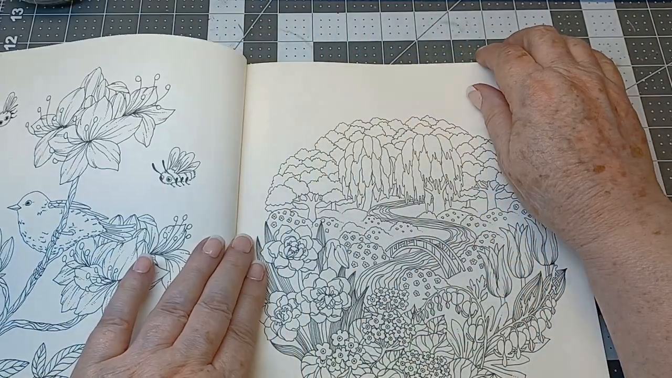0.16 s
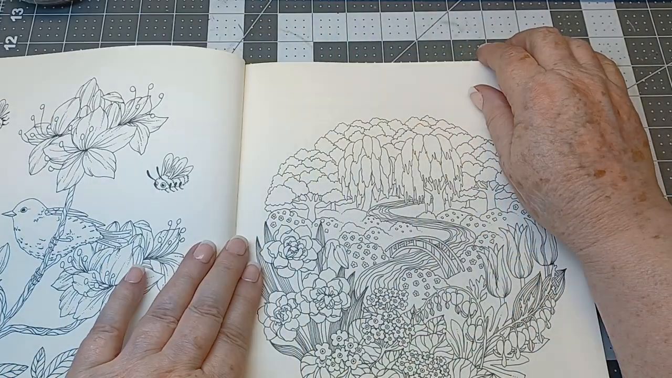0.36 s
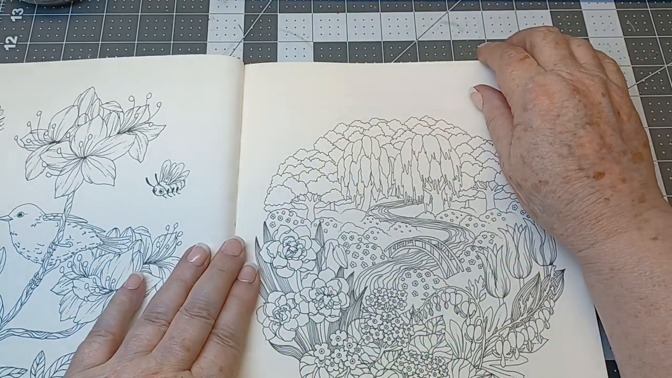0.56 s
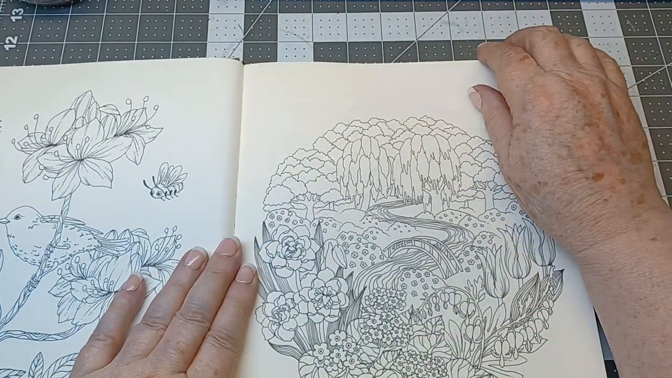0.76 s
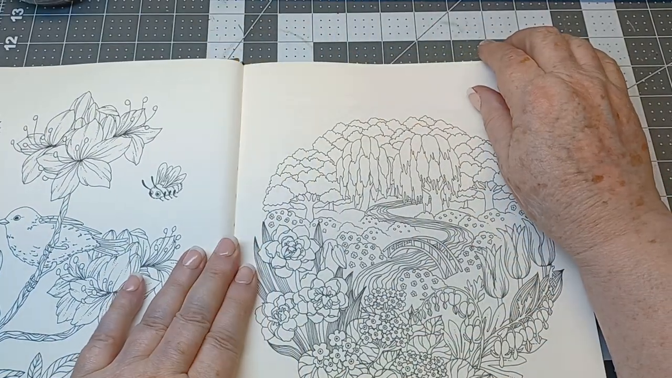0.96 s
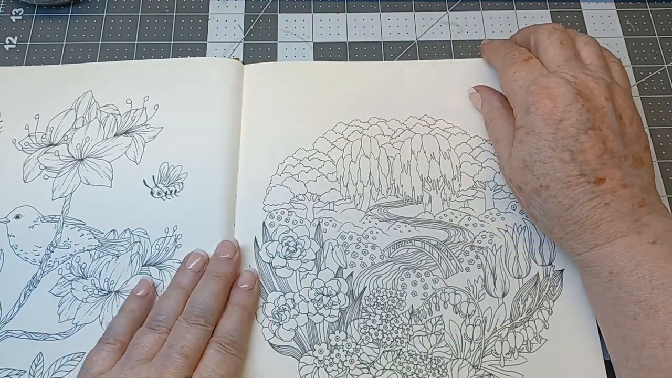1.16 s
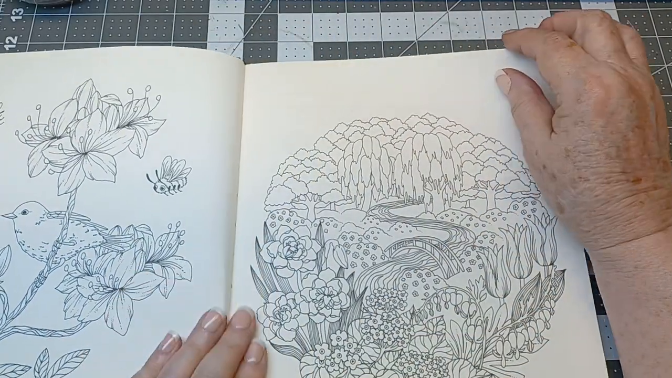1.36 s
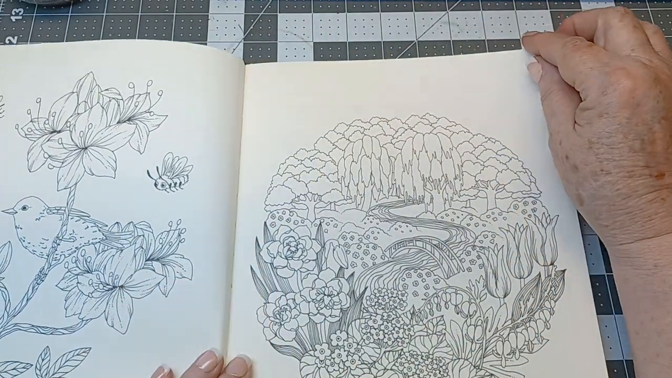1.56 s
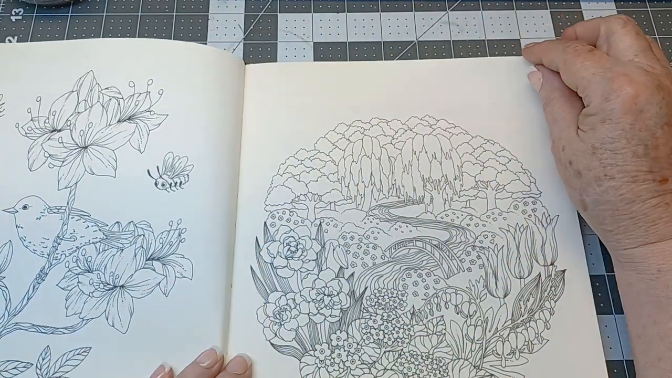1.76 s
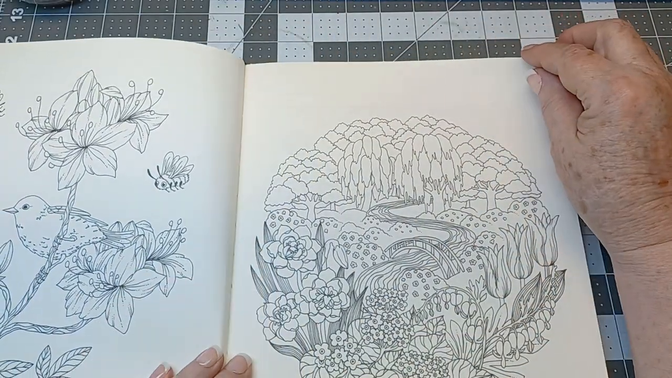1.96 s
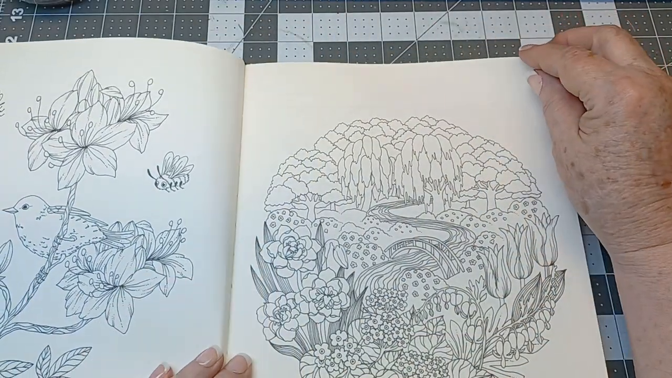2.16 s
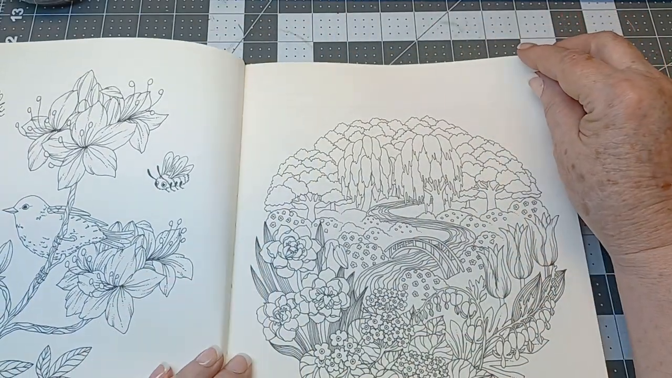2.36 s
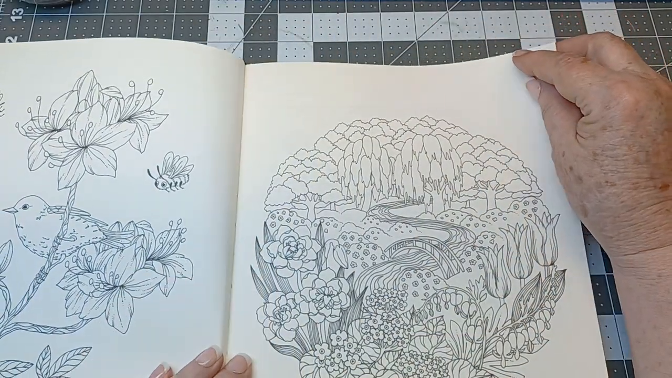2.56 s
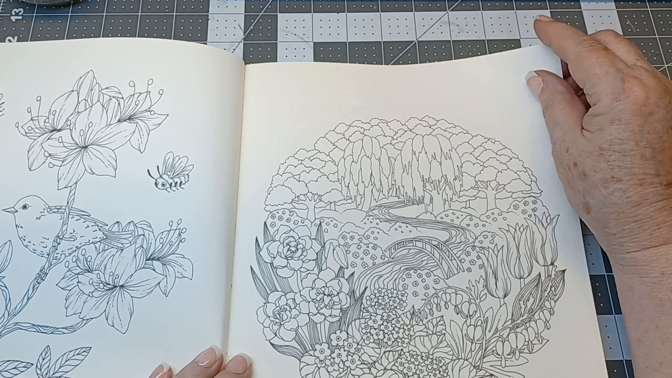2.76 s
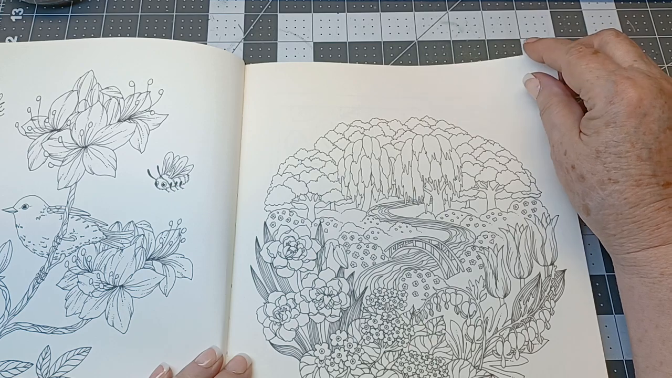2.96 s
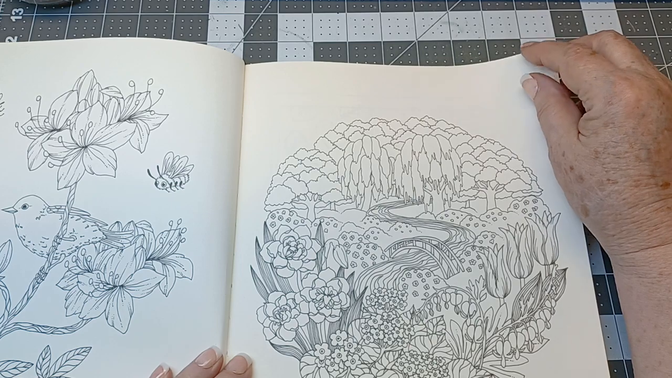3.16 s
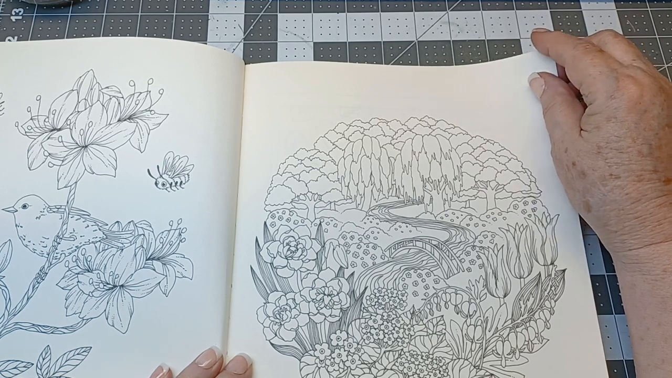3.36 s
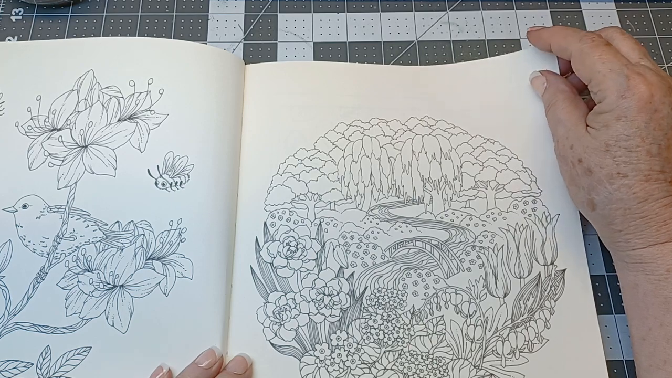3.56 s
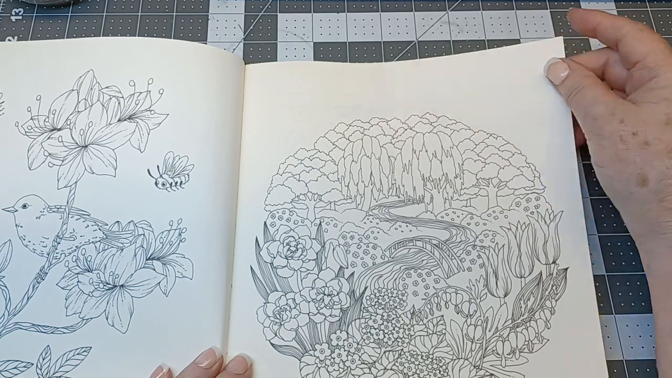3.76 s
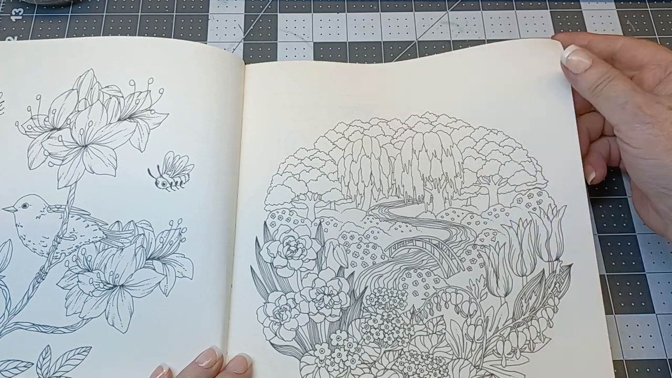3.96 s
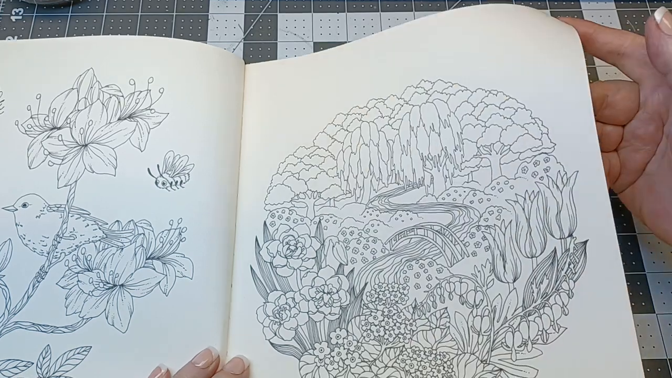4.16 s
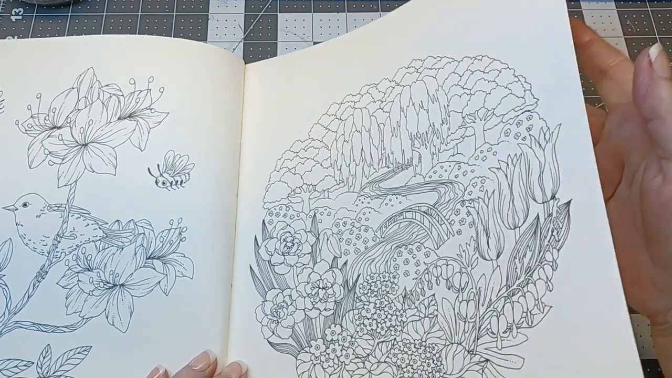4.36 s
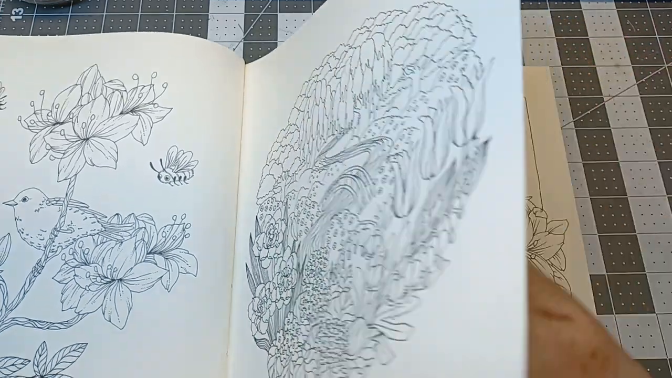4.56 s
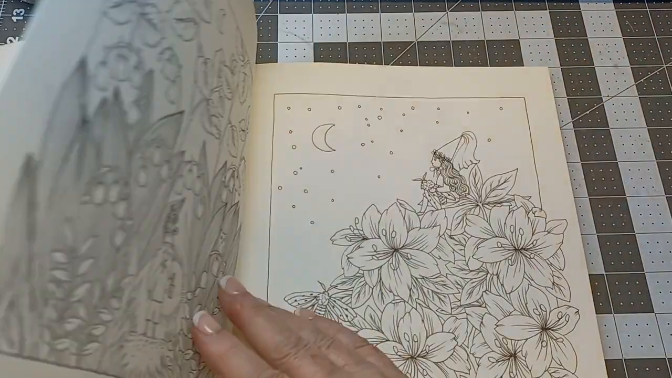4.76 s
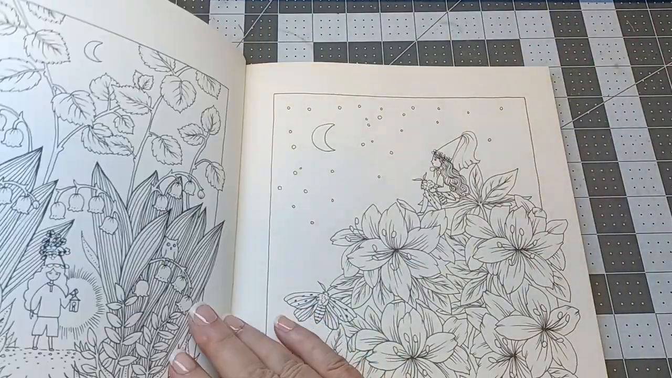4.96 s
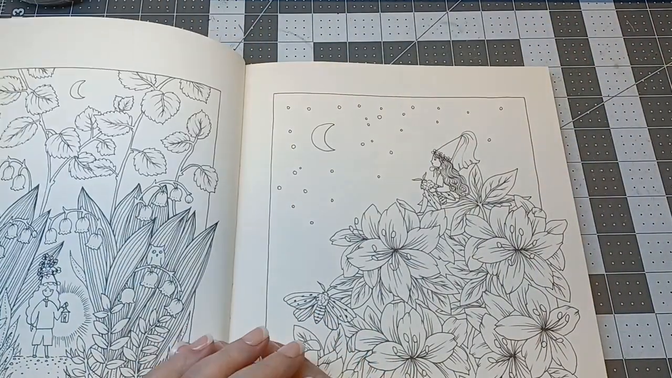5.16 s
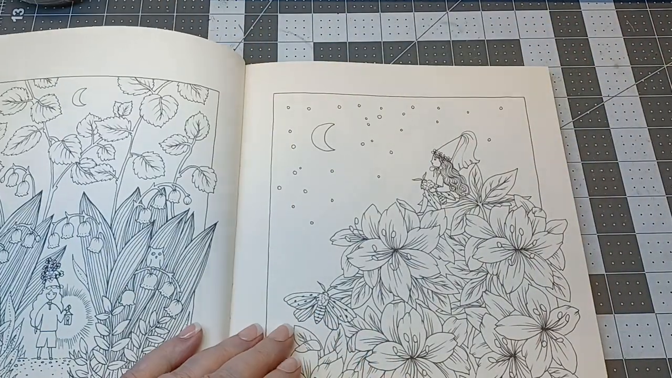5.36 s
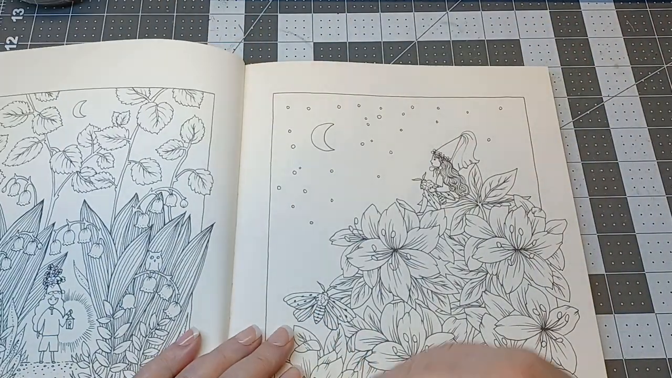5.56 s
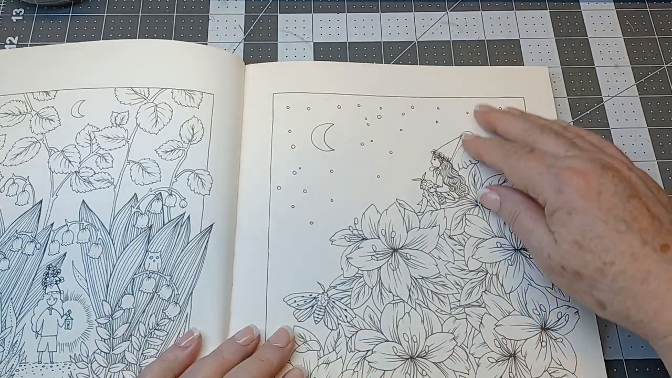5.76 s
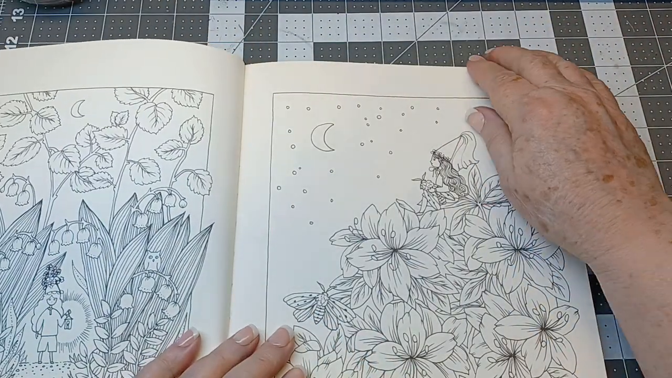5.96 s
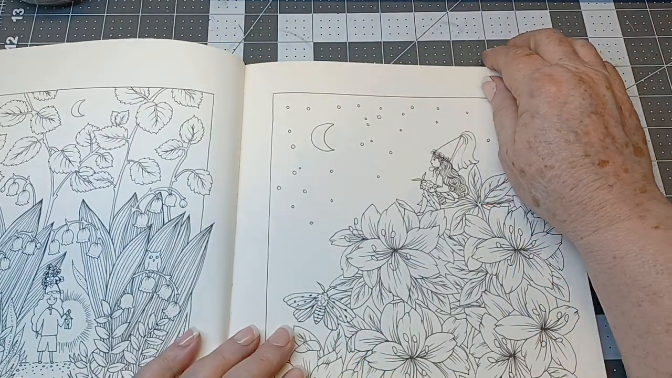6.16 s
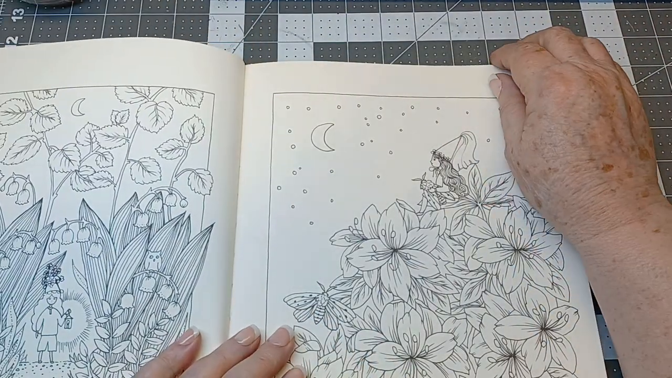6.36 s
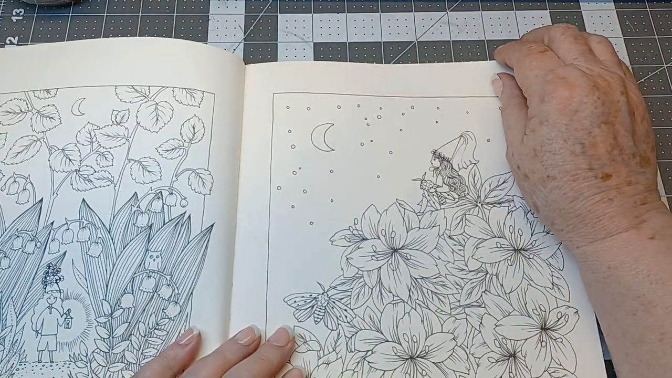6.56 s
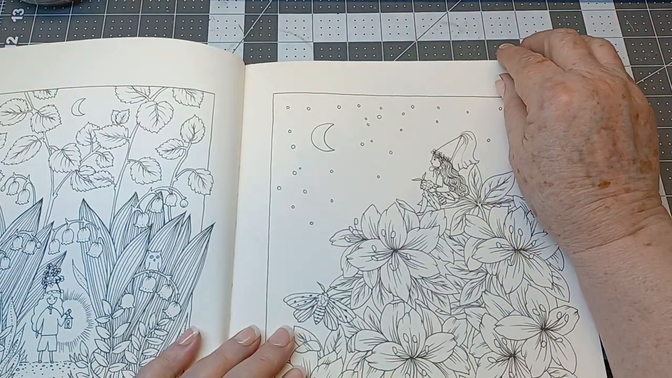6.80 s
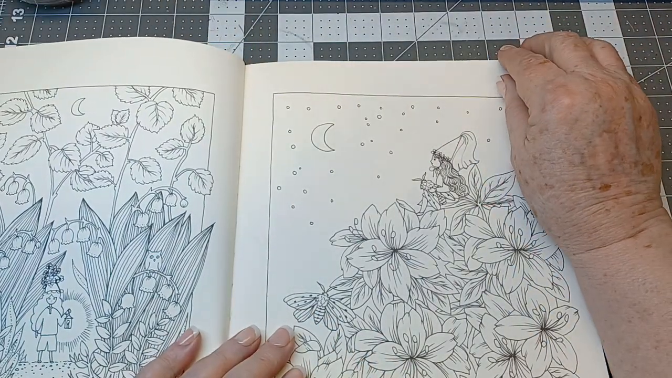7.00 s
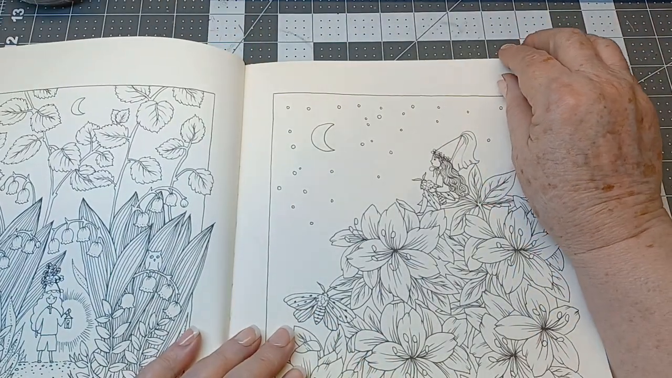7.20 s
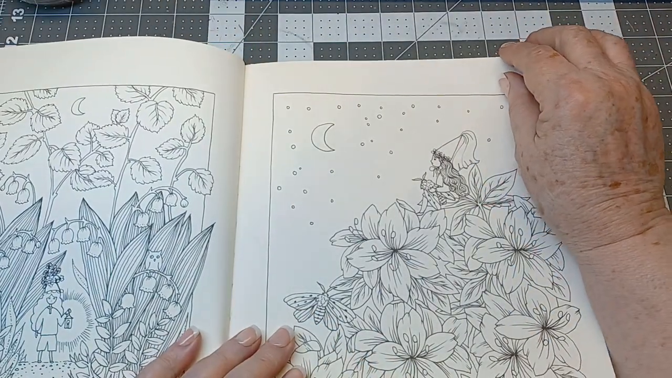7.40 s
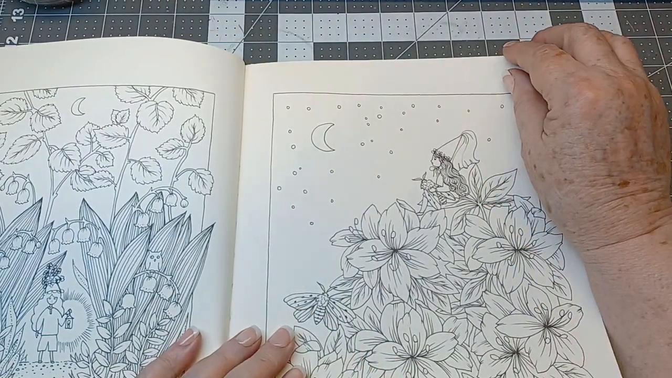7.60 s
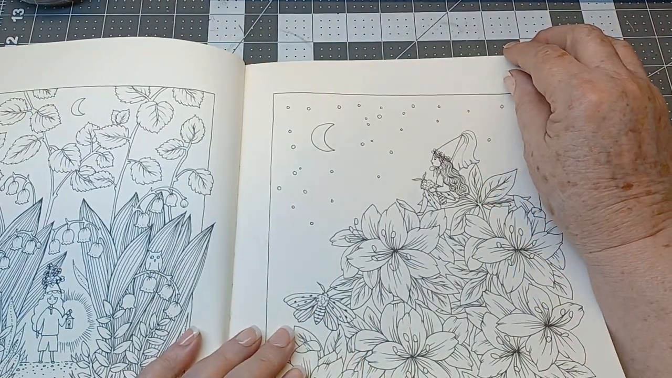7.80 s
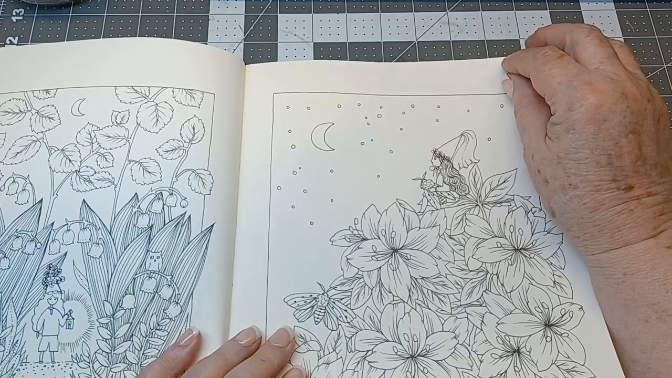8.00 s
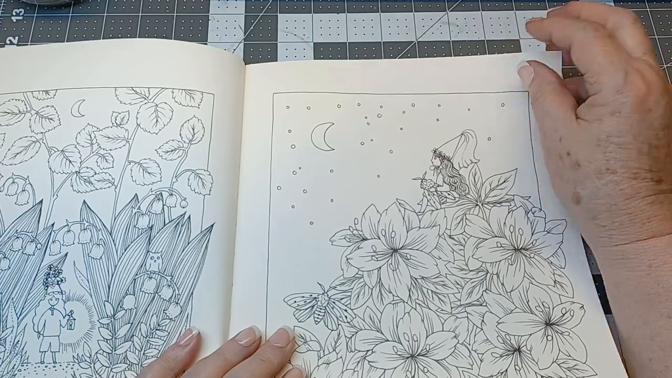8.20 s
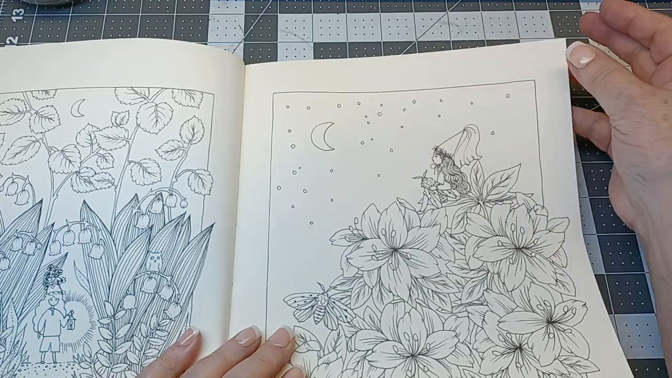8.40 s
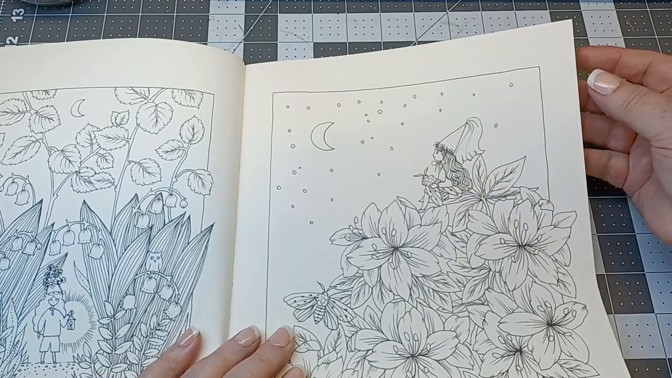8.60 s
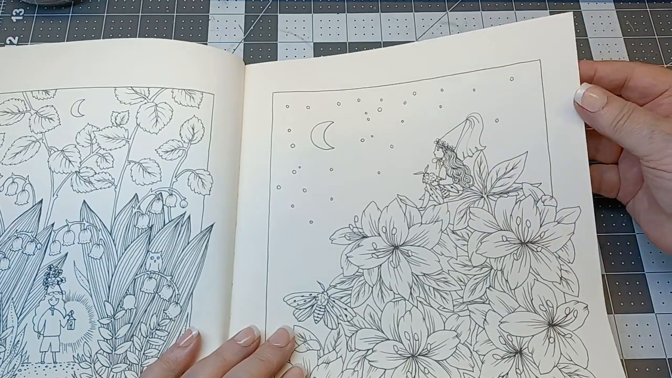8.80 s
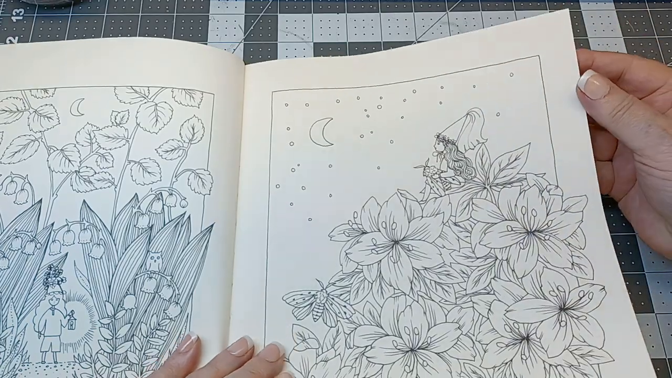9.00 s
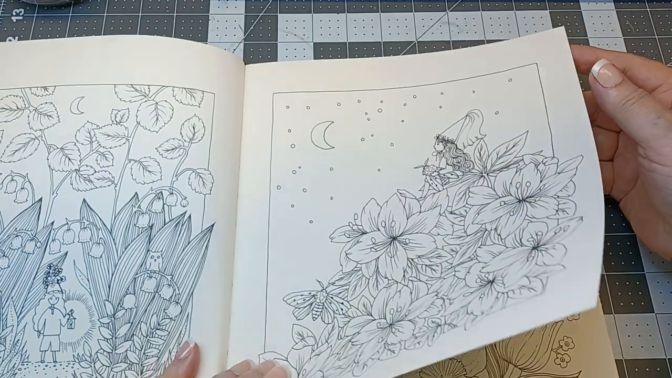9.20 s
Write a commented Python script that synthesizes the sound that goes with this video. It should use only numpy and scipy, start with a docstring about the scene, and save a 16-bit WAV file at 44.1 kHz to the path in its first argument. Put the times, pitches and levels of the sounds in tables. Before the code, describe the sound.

Soft skin hiss and small corner snaps on thick paper, one flapping page turn, and a dull engine hum beyond the wall.

```python
"""A small room, close to a large book whose thick pages are picked at the corner, turned and smoothed.
Skin hisses over the paper, the corner snaps off a fingernail and the lifted sheet buckles and booms.
Snaps and booms ring briefly in the room, over a bed of room tone and a thin electric whine.
Outside an engine pulls away and changes gear, heard dull through the wall."""
import sys
import numpy as np
from scipy import signal
from scipy.fft import rfft, irfft, next_fast_len
from scipy.io import wavfile
from scipy.ndimage import map_coordinates

SR = 44100
rng = np.random.default_rng(int(sys.argv[2]) if len(sys.argv) > 2 else 0)


def materialize(psi):
    """Save the field psi as 16-bit PCM at rate SR to the path in sys.argv[1].

    A 1-D psi becomes a single channel; in a 2-D psi each row is a channel.
    """
    bounded = np.clip(np.atleast_2d(psi).T, -1, 1)
    quanta = np.round(bounded * 32767).astype(np.int16)
    wavfile.write(sys.argv[1], SR, quanta)


N = 407472


def amp(db):
    """dB to gain."""
    return 10 ** (np.asarray(db) / 20)


def unit_rms(x):
    return x / np.sqrt(np.mean(x ** 2) + 1e-20)


def unit_peak(x):
    return x / np.abs(x).max()


def curve_at(points, hz):
    """Reads (freq_hz, value) points on a log frequency axis."""
    freqs, values = np.transpose(points)
    return np.interp(np.log(hz + 1), np.log(freqs + 1), values)


def automation(points):
    """Draws (time_s, value) points as one value per sample."""
    return np.interp(np.arange(N) / SR, *np.transpose(points))


def wobble(rate):
    """A smooth random curve, rate knots a second."""
    knots = rng.standard_normal(int(N * rate / SR) + 4)
    return map_coordinates(knots, [np.arange(N) * rate / SR])


def filtered(x, response):
    """EQs x with a complex response of frequency."""
    size = next_fast_len(x.shape[-1] + 8192)
    return irfft(rfft(x, size) * response(np.fft.rfftfreq(size, 1 / SR)), size)[..., :x.shape[-1]]


def band(f, centre_hz, width_hz):
    """The response of one resonance."""
    return 1j * f * width_hz / (centre_hz ** 2 - f ** 2 + 1j * f * width_hz)


def resonances(peaks):
    """The response of (pitch_hz, width_hz, level_db) resonances, summed in alternating polarity."""
    return lambda f: sum((-1) ** k * amp(db) * band(f, hz, width)
                         for k, (hz, width, db) in enumerate(peaks))


# How alike left and right are: freq_hz, correlation
STEREO_LIKENESS = [(60, 0.38), (300, 0.45), (1500, 0.18), (8000, 0.041)]
def stereo_noise(colour, n):
    """Coloured noise of rms 1, partly alike in the bass and wide in the treble."""
    def mid_side(f):
        angle = np.arccos(curve_at(STEREO_LIKENESS, f)) / 2
        return colour(f) * [np.cos(angle), np.sin(angle)]
    mid, side = filtered(rng.standard_normal((2, n)), mid_side)
    return unit_rms(np.array([mid + side, mid - side]))


# EQ of the still room: freq_hz, gain_db
ROOM_TONE_EQ = [(21, -40), (35, -25.5), (76, -10), (108, -2.5), (176, -12), (245, -4.5), (334, -16),
                (720, -16.5), (1230, -28), (3910, -34.5), (7810, -32), (9340, -40), (13000, -33),
                (16000, -43)]
def room_tone(level_db=-73):
    """A steady, bass-heavy bed of air."""
    return amp(level_db) * stereo_noise(lambda f: amp(curve_at(ROOM_TONE_EQ, f)), N)


def electric_whine(pitch_hz=6342, level_db=-103):
    """A faint, thin tone whose level drifts."""
    return amp(level_db + 3 * wobble(2)) * np.sin(2 * np.pi * pitch_hz * np.arange(N) / SR)


# EQ of skin sliding on paper: freq_hz, gain_db
SKIN_HISS_EQ = [(2000, -31), (4500, -17), (6500, -4), (9000, -6), (13000, 0), (16000, -9)]
def stroke_noise(rustle_db, cup_hz, hiss_db, flex_db):
    """Skin on paper: a rustle coloured by the hollow under the hand, a fine hiss and a low flexing."""
    cup_gain = amp(13) if cup_hz > 500 else 0
    grip_db = 2.2 * rng.standard_normal(80)  # each grip has its own small resonances, on a 200 Hz grid

    def power(f):
        hollow = band(f, 4410, 5000) ** 2 + amp(-14) * band(f, 6500, 3000)  # the flat hand
        if cup_gain:
            hollow += cup_gain * band(f, cup_hz, .16 * cup_hz) ** 2
        grip = amp(np.interp(f / 200, np.arange(len(grip_db)), grip_db))
        rustle = amp(rustle_db) * unit_rms(abs(hollow) * grip)
        hiss = amp(hiss_db) * unit_rms(amp(curve_at(SKIN_HISS_EQ, f)))
        flex = amp(flex_db) * unit_rms(abs(band(f, 1300, 2000)) ** 2)
        return rustle ** 2 + hiss ** 2 + flex ** 2

    level = np.sqrt(np.mean(power(np.linspace(0, SR / 2, 400))))
    return level * stereo_noise(lambda f: np.sqrt(power(f)), round(.8 * SR))


# Hand moves on the page; a cup_hz of 500 or less is a flat hand:
# peak_s, rise_s, fall_s, rustle_db, cup_hz, hiss_db, flex_db
HAND_STROKES = [(.06, 0.32, 0.12, -75.5, 0, -81, -77), (.22, 0.23, 0.088, -74.5, 1698, -79, -77),
                (1.355, .2, 0.13, -54.5, 0, -55.5, -69.5), (1.48, 0.26, 0.13, -65, 2400, -87, -87),
                (1.55, 0.3, 0.2, -69, 3202, -83, -81), (1.69, 0.058, 0.041, -84, 2, -85, -84.5),
                (1.85, 0.15, 0.13, -86, 1842, -95, -80), (1.988, 0.048, 0.029, -74, 0, -97, -90),
                (2.2, 0.05, 0.081, -66, 0, -82, -76), (2.73, 0.094, 0.14, -74, 4598, -82, -80),
                (2.86, 0.075, 0.061, -71, 2320, -97, -78), (2.86, 0.12, .18, -68.5, 0, -83, -82),
                (3.24, 0.036, .12, -77.5, 4600, -100, -81), (3.39, .049, 0.061, -74, 0, -93, -80),
                (3.62, 0.069, 0.38, -73.5, 0, -96, -76.5), (3.75, 0.052, 0.06, -67, 0, -79, -65.5),
                (3.97, 0.12, 0.14, -69, 0, -68, -74), (4.12, 0.17, 0.24, -75, 0, -77, -78),
                (4.43, 0.13, 0.14, -60.5, 0, -58, -61.5), (4.6, 0.11, 0.11, -55.5, 0, -52.5, -50),
                (4.8, 0.3, 0.1, -67.5, 2, -66.5, -74.5), (4.93, .15, 0.49, -72, -3, -72.5, -86),
                (5.08, 0.12, 0.083, -68, -1.5, -70.5, -80.5), (5.32, 0.31, .17, -64, -0.5, -61, -78.5),
                (5.68, 0.023, 0.089, -58.5, -0.5, -54, -68), (5.8, .1, 0.11, -65.5, 0, -55.5, -78),
                (6.05, .22, 0.15, -80.5, 0.5, -67, -93), (6.39, 0.066, 0.047, -77.5, 0, -78, -89),
                (6.5, 0.066, 0.038, -78, 1, -72, -87), (7.322, 0.074, .13, -79.5, 5254, -98, -93),
                (7.55, 0.11, 0.068, -75.5, -0.5, -96.5, -80.5), (8.04, 0.11, 0.057, -79.5, -0.5, -110, -99),
                (8.24, 0.033, 0.096, -68.5, 0, -100, -91), (8.361, .14, 0.22, -69, 5263.5, -72, -96),
                (8.571, 0.11, 0.14, -65, 5333.5, -63, -81), (8.75, 0.21, 0.33, -70.5, 5090.5, -76.5, -79),
                (8.76, 0.033, 0.12, -70.5, 2131, -88, -91.5), (8.88, 0.072, 0.16, -79, 5128, -93, -77),
                (9.0, 0.11, 0.096, -67.5, 6, -67.5, -62.5), (9.111, 0.11, 0.046, -71.5, 0, -72, -68),
                (9.24, 0.087, .096, -56, 0, -100, -48.5)]
def hand_strokes():
    """Skin drags over the paper's tooth, swelling and fading with the pressure of the hand."""
    out = np.zeros((2, N + 2 * SR))
    for peak_s, rise_s, fall_s, rustle_db, cup_hz, hiss_db, flex_db in HAND_STROKES:
        friction = stroke_noise(rustle_db, cup_hz, hiss_db, flex_db)
        half = friction.shape[1] // 2
        t = np.arange(-half, half) / SR
        pressure = np.exp(-2.2 * (t / np.where(t < 0, rise_s, fall_s)) ** 2)
        centre = SR + round(peak_s * SR)
        out[:, centre - half:centre + half] += pressure * friction
    drag = amp(1.2 * wobble(30))  # the finger sticks and slips unevenly
    tooth = amp(2.1 * np.array([wobble(1400), wobble(1500)]))  # fibres catch one by one
    return out[:, SR:SR + N] * drag * tooth


# Reverb time of the small room: freq_hz, t60_s
ROOM_DECAY = [(200, 0.4), (1000, 0.22), (4000, 0.17), (12000, 0.19)]
def room_tail(length_s=.22):
    """A fresh stereo tail of energy about 1 a side; each frequency dies at its own speed."""
    hz, t, spectrum = signal.stft(rng.standard_normal((2, round(length_s * SR))), SR, nperseg=128)
    decay = amp(-60 * t / curve_at(ROOM_DECAY, hz)[:, None])
    _, tail = signal.istft(spectrum * decay, SR, nperseg=128)
    return tail / np.linalg.norm(tail[0])


def place(out, start_s, dry, pan_db, wet_db):
    """Mixes a sound in with its own room tail; positive pan_db leans left."""
    predelay, left_lag = 120, 4  # samples; the left microphone is farther from the book's edge
    sound = amp(wet_db) * signal.fftconvolve(np.pad(dry, (predelay, 0))[None], room_tail(), axes=1)
    sound[0, left_lag:left_lag + len(dry)] += dry * amp(pan_db / 2)
    sound[1, :len(dry)] += dry * amp(-pan_db / 2)
    out[:, round(start_s * SR):][:, :sound.shape[1]] += sound


# The page corner flicking off a nail; thud_db is relative to the click:
# start_s, level_db, pitch_hz, thud_db, thud_hz, pan_db
CORNER_SNAPS = [(.0553, -52, 5450, -14, 1630, 10), (.2126, -54, 5640, -9, 1560, 4),
                (.2686, -49.5, 7060, -24, 760, 1), (.6837, -45.5, 2210, -4, 710, 0),
                (.8553, -39.5, 8000, -40, 384, -9.5), (.8858, -38, 5150, -6, 2300, -8),
                (1.1992, -37, 7600, -36, 406, 1), (1.32, -43.5, 2500, -3.5, 1320, 2),
                (1.6650, -50, 4370, -15.5, 412, 4), (1.9635, -56.5, 3080, -0.5, 1520, 2),
                (2.4278, -44.5, 5400, -14.5, 1170, 7), (2.4773, -23, 5440, -19.5, 1200, 11.5),
                (2.4874, -33.5, 3660, -11, 343, 0), (2.9955, -23, 5150, -11, 1380, 3),
                (3.2285, -60.5, 3805, 2, 920, 1), (3.5413, -34, 4570, -6, 1630, 5),
                (4.2077, -38.5, 5450, 3, 1113, -3.5), (4.2716, -40, 5700, -24.5, 1060, -.5),
                (4.5802, -27, 6400, -15, 1000, 8.5), (5.666, -41.5, 9100, -10, 450, 4),
                (7.5345, -47.5, 4360, -12, 1810, 8), (7.5754, -56.5, 3250, -14, 476, 7),
                (7.8036, -51.5, 4800, -15.5, 2400, 4.5), (7.8610, -21, 4320, -21.5, 1750, -8),
                (8.9425, -43, 5340, -16, 1435, 6), (8.9680, -35, 4960, -9.5, 1350, 2)]
def corner_snaps():
    """The edge lets go: a click a few cycles long, a wide crack, a fizz on top and a thud in the sheet."""
    out = np.zeros((2, N + SR))
    t = np.arange(SR // 20) / SR
    for start_s, level_db, pitch_hz, thud_db, thud_hz, pan_db in CORNER_SNAPS:
        fizz_db = -19 + 10 * np.log2(pitch_hz / 5000)  # higher snaps fizz more
        noise = rng.standard_normal((3, len(t)))
        click = np.sin(2 * np.pi * pitch_hz * t) * np.exp(-((t * pitch_hz - 3) / 1.3) ** 2)
        crack = filtered(noise[0] * amp(-60 * t / .016), lambda f: band(f, pitch_hz, .8 * pitch_hz) ** 2)
        fizz = filtered(noise[1] * amp(-60 * t / .00817), lambda f: band(f, 12500, 7000) ** 2)
        body = resonances([(thud_hz, .57 * thud_hz, 0), (300, 220, -3)])
        thud = filtered(noise[2] * amp(-60 * t / .035), body)
        snap = click + .2 * unit_peak(crack) + amp(fizz_db) * unit_peak(fizz)
        snap += amp(thud_db) * unit_peak(thud)
        place(out, start_s - .0003, amp(level_db) * snap, pan_db, wet_db=-2.5)
    return out[:, :N]


# The engine's revs: time_s, firing_hz
ENGINE_REVS = [(0, 99), (1.5, 103.2), (2.65, 106.2), (3.6, 111.8), (5.2, 117.4), (5.5, 120.7),
               (5.62, 129.5), (6.28, 148), (6.4, 148.9), (6.49, 172), (6.6, 137.2), (6.72, 130.8),
               (6.84, 139.7), (6.95, 155.7), (7.31, 156.6), (7.41, 163.9), (7.77, 168.6), (7.9, 153.8),
               (8.15, 122.8), (8.24, 163.1), (8.44, 165.5), (8.7, 151.5), (9.24, 145.8)]
# Fader ride of the firing tone, up under throttle and down at each gear change: time_s, level_db
ENGINE_THROTTLE = [(0, -83.5), (.9, -80), (1.16, -73.5), (1.52, -63.5), (1.83, -68.5), (2.21, -53),
                   (2.42, -54.5), (2.64, -44.5), (2.88, -52), (3.55, -59.5), (3.78, -54), (4.3, -60),
                   (5.17, -61), (5.46, -65.5), (5.58, -72.5), (5.74, -51), (5.89, -51), (5.97, -56.5),
                   (6.05, -50), (6.25, -50.5), (6.31, -69), (6.48, -67.5), (6.72, -70.5), (6.77, -55.5),
                   (6.84, -65.5), (6.95, -62), (7.18, -55.5), (7.31, -57.5), (7.41, -80), (7.77, -78),
                   (7.9, -61), (8.16, -64.5), (8.23, -60), (8.31, -71), (8.64, -62), (8.77, -76.5),
                   (9.08, -68.5), (9.24, -68)]
# Balance of the shaft orders as the revs climb: firing_multiple, level_db, rise_db_per_octave
SHAFT_ORDERS = [(1.64, -3, 25), (2, 0, 0), (2.25, -5, 25)]
# EQ of the rumble through the wall: freq_hz, gain_db
RUMBLE_EQ = [(25, -55), (50, -19), (82, -6), (110, -2), (180, -10), (400, -61.5)]
def engine_outside(cruise_hz=120, cruise_db=-60):
    """A nearly clean firing tone, unsteady shaft orders and a rumble; the wall booms at its own notes."""
    firing_hz, tone_db = automation(ENGINE_REVS), automation(ENGINE_THROTTLE)
    load_db = tone_db - cruise_db
    octaves = np.log2(firing_hz / cruise_hz)
    upper_db = -77.5 + .7 * load_db + 5.5 * octaves
    rumble_db = -66.5 + .46 * load_db + 6.5 * octaves
    boom_db = rumble_db - 8 + 9.3 * octaves  # speed stirs the wall's lowest note
    phase = 2 * np.pi * np.cumsum(firing_hz) / SR
    tone = np.sqrt(2) * amp(tone_db + 1.3 * wobble(21)) * np.sin(phase + .027 * wobble(9))
    orders = np.zeros((2, N))
    for multiple, level_db, rise_db in SHAFT_ORDERS:
        for side, offset_rad in enumerate((0, .4)):
            gain = amp(level_db + rise_db * octaves + 1.2 * wobble(13))
            orders[side] += gain * np.sin(multiple * (phase + offset_rad) + .39 * wobble(14))
    wall_roar = stereo_noise(resonances([(224, 25, 0), (257, 25, -2), (330, 90, -10)]), N)
    upper = amp(upper_db) * (1.1 * unit_rms(orders) + 1.4 * wall_roar)
    rumble = amp(rumble_db) * stereo_noise(lambda f: amp(curve_at(RUMBLE_EQ, f)), N)
    wall_boom = amp(boom_db) * unit_rms(filtered(rng.standard_normal(N), lambda f: band(f, 80, 4.5)))
    return tone * amp([[.3], [-.3]]) + upper + rumble + wall_boom


# Body notes of the loose sheet: pitch_hz, width_hz, level_db
SHEET_MODES = [(343, 240, -9.5), (727, 67, 1.5), (1004, 150, 0.5), (1634, 542, -2.5)]
# The lifted page popping; stiffness_hz rolls off the boom's top, bright_db is relative to the boom:
# start_s, level_db, stiffness_hz, bright_db, length_s
SHEET_BUCKLES = [(4.205, -36.5, 1797, -27, 0.028), (4.229, -17, 2240, -30, .012),
                 (4.241, -18, 1998, -41, 0.012), (4.254, -32.5, 1316, -36, 0.024),
                 (4.302, -30, 810, -37, 0.017), (4.328, -40.5, 1212, -20, .03),
                 (4.399, -45, 2204, -18, .04), (4.533, -34, 2004, -21.5, .037),
                 (4.563, -17.5, 2224, -2, .011), (4.575, -24, 1600, -23, .01),
                 (4.588, -31, 1100, -25, 0.021), (4.732, -49, 900, -23, 0.029),
                 (9.16, -47.5, 1800, -22, 0.043), (9.189, -40.5, 1120, -25, 0.051)]
def sheet_buckles(low_cut_hz=130):
    """The bent sheet flips its curve in a run of uneven jolts that ring its low resonances."""
    out = np.zeros((2, N + SR))
    t = np.arange(SR // 8) / SR
    for start_s, level_db, stiffness_hz, bright_db, length_s in SHEET_BUCKLES:
        def body(f):
            low_cut = 1j * f / (low_cut_hz + 1j * f)  # a loose sheet radiates little bass
            return resonances(SHEET_MODES)(f) * low_cut / (1 + 1j * f / stiffness_hz) ** 3
        attack_s = 8 * length_s ** 2 + .00078
        envelope = (1 - np.exp(-t / attack_s)) * np.exp(-(t / length_s) ** 1.74)
        jolts = envelope * rng.standard_normal(len(t)) * amp(1.8 * rng.standard_normal(len(t)))
        boom = filtered(jolts, body)
        edge = filtered(jolts * amp(-60 * t / .021), lambda f: band(f, 3300, 3000) ** 2)
        buckle = unit_peak(boom) + amp(bright_db) * unit_peak(edge)
        place(out, start_s - .001, amp(level_db) * buckle, pan_db=4, wet_db=-7.5)
    return out[:, :N]


def scene():
    """Paper up close, the engine far off, room tone and whine under it all."""
    bed = room_tone() + electric_whine()
    paper = corner_snaps() + sheet_buckles() + hand_strokes()
    return bed + paper + engine_outside()


def record(dry):
    """A brick-wall high cut on the whole mix."""
    return filtered(dry, lambda hz: hz < 15830)


dry = scene()
out = record(dry)
materialize(out)
```